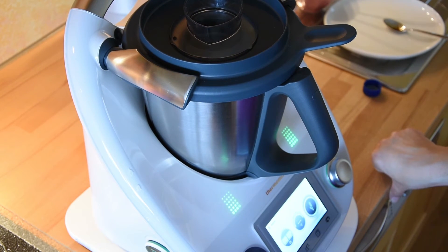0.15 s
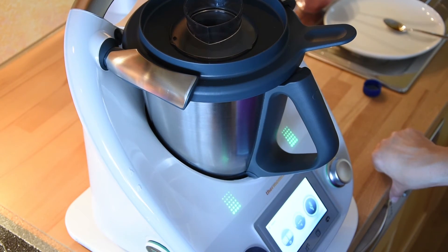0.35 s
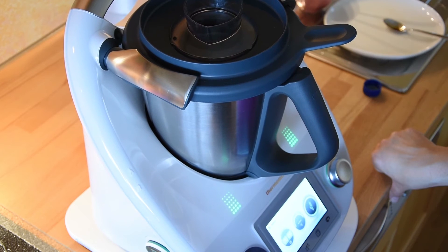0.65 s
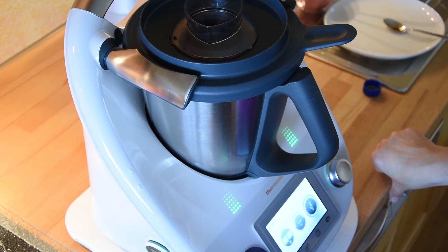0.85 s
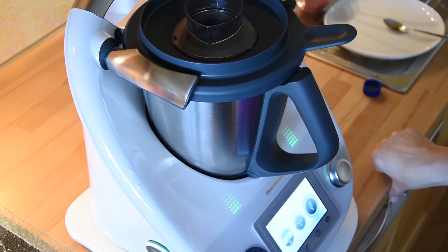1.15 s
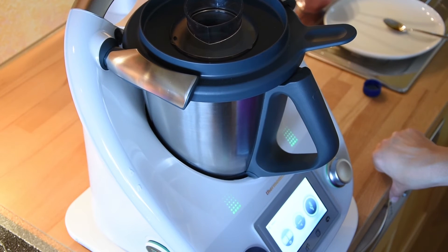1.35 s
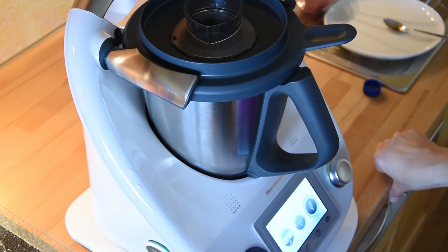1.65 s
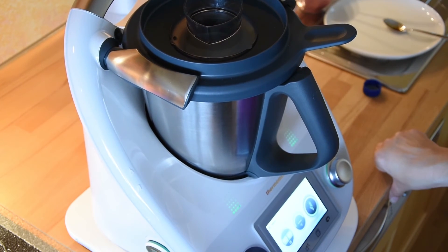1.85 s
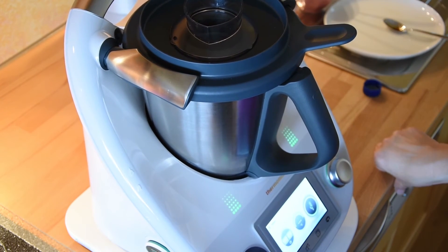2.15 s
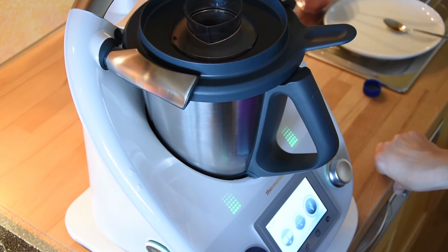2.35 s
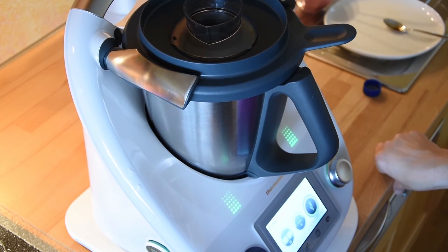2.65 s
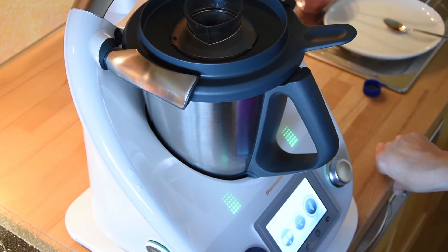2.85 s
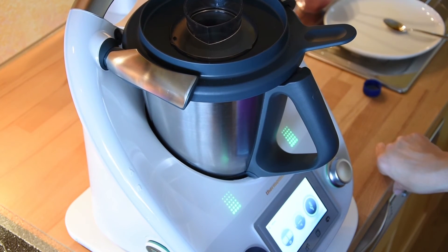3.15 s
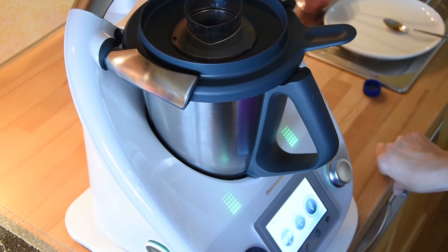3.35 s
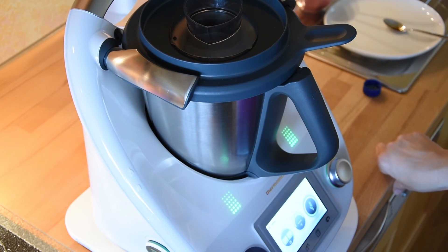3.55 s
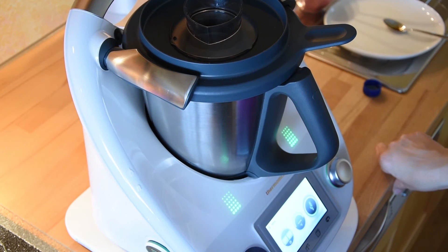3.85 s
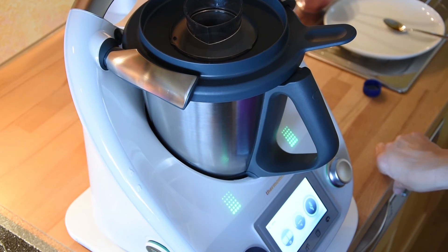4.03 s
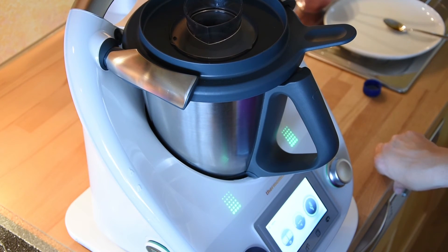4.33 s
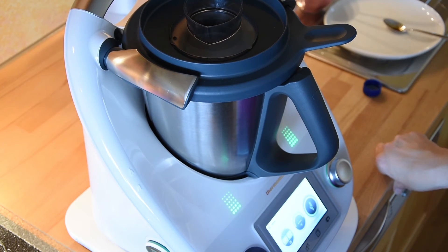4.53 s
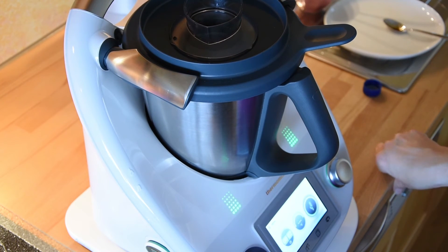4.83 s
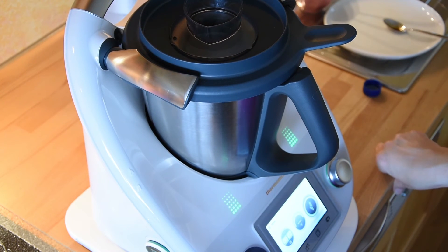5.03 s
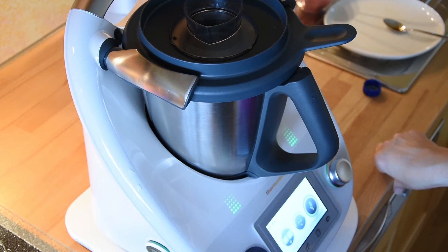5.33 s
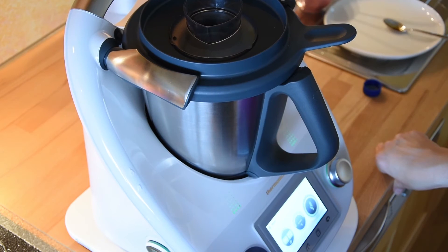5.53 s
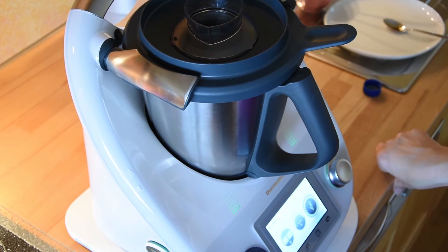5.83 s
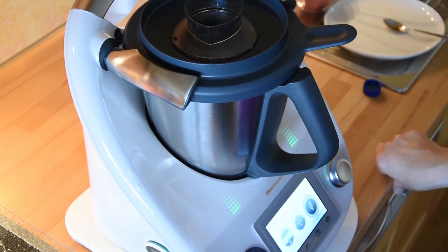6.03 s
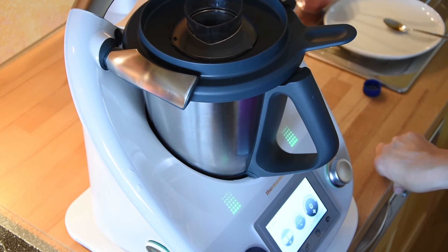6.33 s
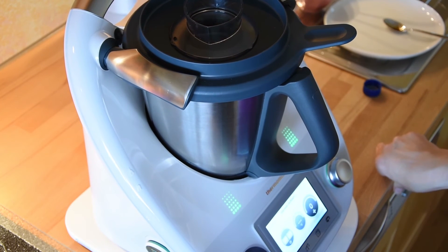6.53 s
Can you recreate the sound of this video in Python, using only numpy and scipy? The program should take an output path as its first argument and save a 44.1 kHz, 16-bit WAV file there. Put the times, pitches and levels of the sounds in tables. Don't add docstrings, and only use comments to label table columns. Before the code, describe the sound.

Quiet kitchen room tone with very faint hum and whine; a barely audible winding song from 0.2 s. At 0.3 s a food processor jerks on: a dense, rough, buzzing growl around 500 to 2000 Hz with an unsteady pole tone near 945 Hz, low counter rumble, wet lumps slapping the steel bowl and a bright electrical hiss. The rumble heaves irregularly; a loose cap rattles briefly, notably around 1.6 s, and tiny hard ticks scatter. At 2.64 s it brakes sharply, hiss lingering to about 2.85 s, with faint sagging tones and dull thumps until 3.1 s. Then quiet, one tiny tick at 4.6 s. At 5.33 s a second burst starts, with hard knocks near 5.47 s and heavy cap chatter from 5.7 s; it stops at 6.2 s, sagging briefly over low rocking. At 6.6 s crockery clangs hard, with quick small bounces.

```python
import sys
import numpy as np
from scipy import signal
from scipy.fft import rfft, irfft, next_fast_len
from scipy.io import wavfile
from scipy.ndimage import map_coordinates

SR = 44100
rng = np.random.default_rng(int(sys.argv[2]) if len(sys.argv) > 2 else 0)


def volts_from_decibels(level):
    exponent = np.asarray(level, float) / 20
    return 10 ** exponent


def waveform_to_disk(signal):
    frames = np.transpose(np.atleast_2d(signal))
    scaled = np.clip(frames, -1, 1) * 32767
    samples = np.round(scaled).astype(np.int16)
    wavfile.write(sys.argv[1], SR, samples)


N = 295019
TIME = np.arange(N) / SR

# [s, s, dB, s]
MOTOR_RUNS = [
    (0.313, 2.641, -22.5, 0.0059),
    (5.3312, 6.191, -22, 0.051),
]


def unit(x):
    return x / np.sqrt(np.mean(x ** 2) + 1e-20)


def along(points, hz):
    f, v = np.transpose(points)
    return np.interp(np.log(hz + 1), np.log(f + 1), v)


def over_time(points):
    return np.interp(TIME, *np.transpose(points))


def wobble(rate):
    knots = rng.standard_normal(int(N * rate / SR) + 4)
    return map_coordinates(knots, [TIME * rate])


def filtered(x, response):
    m = next_fast_len(N + SR // 2)
    spectrum = rfft(x, m) * response(np.fft.rfftfreq(m, 1 / SR))
    return irfft(spectrum, m)[..., :N]


def resonant(x, modes, skirt=1.24):
    def response(f):
        power = 0
        for centre, width, db in modes:
            flank = (1 + (2 * (f - centre) / width) ** 2) ** -np.clip(skirt, 1, 3)
            power = power + volts_from_decibels(2 * db) * flank
        return np.sqrt(power)
    return unit(filtered(x, response))


def coloured(x, spectrum):
    return unit(filtered(x, lambda hz: volts_from_decibels(along(spectrum, hz))))


def shaking(lumpy_db, rate):
    return unit(rng.standard_normal(N) * volts_from_decibels(lumpy_db * wobble(rate)))


def motor():
    housing, rumble, churn, hiss = run_gains()
    load = wobble(14)
    tone, pulls = rotor()
    out = housing * volts_from_decibels(0.41 * load) * (volts_from_decibels(-1) * housing_body() + tone) + pulls
    out += rumble * volts_from_decibels(1.1 * load + 0.8 * wobble(9)) * counter()
    out += churn * volts_from_decibels(0.9 * wobble(25)) * mixture()
    return out + hiss * volts_from_decibels(0.7 * wobble(17)) * switching()


def run_gains():
    # [s, dB]
    splash = [(.33, 6), (.6, 2.5), (.8, 1), (1.2, -1), (1.5, 1.5), (1.8, 0), (2.1, 1), (2.64, 1), (5.34, 6),
              (5.45, 3.5), (5.6, 3.5), (5.8, -1), (6.05, 7), (6.25, 0.5)]
    # [s, dB]
    heaves = [(.74, 9), (.94, 4.5), (1.2, 4.5), (1.6, 4), (1.87, 4), (2.21, 5.5), (2.63, 3.5), (5.44, 7),
              (5.665, 2), (5.8, 3.5), (6.06, 7)]
    engage_s, heave_s = 0.004, 0.037
    splash_db = over_time(splash)
    heave_db = sum(db * np.exp(-((TIME - s) / heave_s) ** 2) for s, db in heaves)
    gains = 0
    for start, cut, db, slump in MOTOR_RUNS:
        since, after = np.maximum(TIME - start, 0), np.maximum(TIME - cut, 0)
        settle = np.maximum(after - slump, 0)
        housing = volts_from_decibels(2 * np.exp(-since / 0.1) - 140 * after)
        housing = housing + (after > 0) * volts_from_decibels(-29.5 - 25 * after)
        lurch_db = 9.5 * np.exp(-since / 0.1)
        rumble = volts_from_decibels(-19.5 + lurch_db + heave_db - 135 * settle)
        churn = volts_from_decibels(-20 + splash_db - 93 * settle)
        braking_db = -5 * np.minimum(after / 0.045, 1) - 166 * np.maximum(after - 0.19, 0)
        hiss = volts_from_decibels(-31 + 0.91 * splash_db + braking_db)
        engaged = np.clip((TIME - start) / engage_s + 0.5, 0, 1) * volts_from_decibels(db)
        gains = gains + engaged * np.array([housing, rumble, churn, hiss])
    return gains


def housing_body():
    # [Hz, Hz, dB, dB]
    modes = [(538, 30, -10, -1), (572, 24, -9, -1), (816, 36, -14, 2), (885, 45, -11, -2),
             (943, 20, -4.5, -2), (1028, 20, -7, 2), (1085, 35, -9, 4), (1118, 22, -9, 2),
             (1190, 60, -12, 3), (1292, 45, -9, 1), (1383, 24, -13, 0), (1460, 45, -12, 0),
             (1540, 60, -13, 1), (1610, 55, -10, 1), (1692, 24, -7, 3), (1755, 40, -7, 1),
             (1805, 32, -2.5, -1), (1886, 26, -5, 0), (1935, 40, -11, 0), (2070, 90, -19, 0),
             (2186, 40, -17, 0), (2299, 30, -16, -1), (2420, 80, -18, 0), (2558, 32, -15, 0),
             (2680, 60, -23, 2)]
    # [Hz, dB per Hz]
    shell = [(250, -65), (400, -1.5), (480, 2), (640, -4), (720, -3.5), (800, -1.5), (1400, -6.5),
             (1950, -5), (2600, -7), (3000, -14.5), (3600, -62)]
    # [s, 0 soft, 1 stiff, above 1 stiffer still]
    stiffness = [(0, 0.27), (.45, 0.28), (.7, 0), (2.4, 0), (2.7, 0.74), (5.33, 0.42), (5.5, 1.6),
                 (5.7, 1.9), (5.9, 0.23), (6.3, 0.53)]
    torque = shaking(lumpy_db=-0.5, rate=160)
    soft = resonant(torque, [(hz, w, db) for hz, w, db, _ in modes])
    stiff = resonant(torque, [(hz, w, db + change) for hz, w, db, change in modes])
    ring = soft + (stiff - soft) * over_time(stiffness)
    return unit(ring + volts_from_decibels(-11) * coloured(shaking(lumpy_db=2, rate=150), shell))


def rotor():
    # [s, Hz, dB]
    pole_tone = [(.33, 945, -24), (.5, 945, -15), (.62, 942, -10), (.8, 939, -13), (1.05, 947, -9),
                 (1.3, 948, -11), (1.5, 941, -14), (1.75, 945, -10), (2.1, 948, -10), (2.35, 940, -12),
                 (2.64, 936, -14), (5.34, 950, -24), (5.55, 950, -18), (5.68, 946, -12), (5.82, 924, -10),
                 (5.95, 942, -11), (6.1, 940, -13), (6.25, 934, -13)]
    # [s, s, Hz, Hz, dB]
    drags = [(.32, 0.38, 850, 660, -32.5), (.315, .37, 283, 237, -38.5), (5.335, 5.43, 285, 273, -35.5),
             (.315, 0.35, 548, 560, -28), (.46, 0.53, 550, 575, -28), (1.662, 1.76, 560, 530, -30),
             (5.38, 5.47, 1800, 1600, -24.5), (2.1, 2.18, 560, 545, -31.5), (5.92, 5.97, 565, 576, -38),
             (5.63, 5.68, 660, 558, -32.5), (5.419, 5.623, 1095, 770, -33), (5.499, 5.585, 1770, 1730, -27),
             (5.601, 5.739, 1793, 1767, -29), (5.66, 5.76, 2000, 2700, -31), (5.596, 5.7, 970, 820, -29.5),
             (5.792, 5.878, 620, 490, -29), (6.05, 6.22, 1895, 1600, -29), (0.522, 0.9, 2100, 1600, -35),
             (2.48, 2.581, 1810, 1800, -35)]
    s, hz, db = np.transpose(pole_tone)
    speed = np.interp(TIME, s, hz)
    turn = 2 * np.pi * np.cumsum(speed) / SR + 0.95 * wobble(30)
    flutter_db = 3.5
    tone = volts_from_decibels(flutter_db * wobble(22)) * np.sin(turn)
    tone += volts_from_decibels(-5 + flutter_db * wobble(30)) * np.sin(2 * turn)
    pulls, rough, flutter = np.zeros(N), 0.7 * wobble(45), wobble(40)
    for start, end, from_hz, to_hz, level_db in drags:
        part = slice(round(start * SR), round(end * SR))
        glide = np.linspace(from_hz, to_hz, part.stop - part.start)
        swell = volts_from_decibels(level_db + 2 * flutter[part]) * np.hanning(len(glide)) ** 0.5
        pulls[part] += swell * np.sin(2 * np.pi * np.cumsum(glide) / SR + rough[part])
    first, second = MOTOR_RUNS
    unpowered = np.maximum(TIME - np.where(TIME < second[0], first[1], second[1]), 0)
    level = volts_from_decibels(np.interp(TIME, s, db + 0.5) - 150 * unpowered)
    return np.sqrt(2) * (level * tone), np.sqrt(2) * pulls


def counter():
    # [Hz, Hz, dB]
    modes = [(126.5, 34, -11.5), (190, 10.1, 1), (238.5, 48, -5.5), (283.5, 14, -3.5), (319, 64, -6)]
    return resonant(shaking(lumpy_db=1.5, rate=40), modes, skirt=1.5)


def mixture():
    # [Hz, dB per Hz]
    slap = [(1590, -24), (2700, 2), (3100, -2.5), (3290, 3), (3470, 3), (3880, 1), (4370, -2.5),
            (5330, -8.5), (6930, -14), (8390, -29), (10000, -21), (13000, -51.5), (22000, -120)]
    # [Hz, Hz, dB]
    bowl = [(3350, 190, 0.5), (4990, 130, -7), (7420, 69, -18), (7800, 58, -15), (7900, 60, -10),
            (8500, 240, -15), (9700, 63, -13), (11070, 96, -24), (13000, 85, -20)]
    wet = coloured(shaking(lumpy_db=2, rate=300), slap)
    return unit(wet + 0.45 * resonant(shaking(lumpy_db=2, rate=300), bowl))


def switching():
    # [Hz, dB per Hz]
    sizzle = [(5290, -12), (9000, 3), (9750, 0), (11100, 4), (11500, -5), (12100, -6), (13700, -13),
              (15600, -25)]
    # [Hz, Hz, dB]
    whine = [(11160, 200, -1), (11560, 160, -3)]
    chopped = shaking(lumpy_db=1.5, rate=400)
    return unit(coloured(chopped, sizzle) + volts_from_decibels(-12) * resonant(chopped, whine))


def waking():
    # [s, s, s, dB]
    wake = [
        (.2, .25, .315, -60),
        (5.17, 5.268, 5.333, -60),
    ]
    # [Hz, Hz, dB]
    windings = [(1830, 170, 0), (1800, 40, 6), (1870, 40, 3)]
    gain = 0
    for creep, on, end, db in wake:
        times = [creep, on - 0.01, on, end, end + 0.01]
        levels = [db - 18, db - 3, db, db + 5, -90]
        gain = gain + volts_from_decibels(np.interp(TIME, times, levels, -120, -120))
    return gain * resonant(rng.standard_normal(N), windings)


def cap():
    # [s, dB, dB, s]
    knocks = [(0.309, -43.5, -7, 0.03), (0.358, -38.5, 3.5, 0.046), (0.513, -48.5, 0, .04),
              (1.582, -41, 0, 0.03), (1.635, -39.5, 0.5, 0.037), (1.682, -41, 3.5, 0.031),
              (1.721, -41, -3, .015), (1.86, -49, -2, 0.018), (2.6, -43, 3, 0.049),
              (5.327, -44.5, -8, 0.045), (5.57, -43, 2, 0.14), (5.691, -41, -2, 0.022),
              (5.728, -40, 4.5, 0.019), (5.764, -40.5, 1, 0.067), (5.834, -44, 4, 0.029),
              (5.865, -37, 0, 0.046), (5.924, -37, -1, 0.057), (5.978, -35, -7, 0.018),
              (6.03, -34.5, -2.5, 0.073), (6.069, -38, -4, 0.053), (6.133, -36, -4, 0.024),
              (6.174, -38.5, 0, 0.04), (6.235, -36, 0.5, 0.06)]
    # [Hz, Hz, dB]
    high_modes = [(5200, 84, -3), (5600, 25, -3), (6350, 190, 3), (7000, 42, -18), (7250, 110, 7.5),
                  (7660, 52, 11), (8450, 210, 7.5), (8920, 57, -15), (9110, 44, 4), (10200, 33, 1),
                  (11200, 280, -9), (12100, 55, -13)]
    low_modes = [(3170, 120, 5.5), (3670, 130, 7), (4125, 49, 8)]
    # [Hz, dB per Hz]
    broad = [(2650, 1), (4500, -17), (6180, 2), (6750, -16.5), (8620, -1), (9370, -6.5), (11700, -10),
             (15600, -53)]
    high, low = np.zeros((2, N))
    t = TIME[:SR // 4]
    for s, db, low_db, length in knocks:
        fall_db = 60 * t / 0.8 + 60 * np.maximum(t - length, 0) / 0.1
        buzz = volts_from_decibels(db - fall_db) * (1 - np.exp(-t / 0.001))
        high[round(s * SR):][:len(t)] += buzz
        low[round(s * SR):][:len(t)] += buzz * volts_from_decibels(low_db)
    chatter = shaking(lumpy_db=2, rate=500)
    bright = resonant(chatter, high_modes, skirt=1.1)
    bright = bright + 1.1 * coloured(shaking(lumpy_db=2, rate=450), broad)
    clack = resonant(chatter, [(hz, 3 * w, db) for hz, w, db in low_modes], skirt=0.8)
    return high * unit(bright) + low * clack


def ticks():
    # [s, dB, Hz]
    hits = [(.679, -46, 5200), (.718, -50, 6000), (.855, -46, 5900), (1.13, -49, 5700), (1.245, -44, 11000),
            (1.361, -49, 10000), (1.445, -43, 8000), (1.522, -41, 5430), (1.9, -47, 8000),
            (1.966, -48, 6100), (2.079, -49, 5200), (2.137, -41, 7950), (2.26, -43, 7000),
            (2.305, -46, 6000), (2.385, -44, 5000), (2.448, -55, 8000), (2.467, -38.5, 10100),
            (2.484, -39, 9000), (4.636, -60, 2600), (5.468, -27, 3600), (5.475, -28, 3600),
            (.316, -44, 10000), (5.334, -42, 10000), (.882, -48, 8000), (1.643, -42, 8000),
            (1.692, -40, 8200), (5.736, -40, 8500), (6.6045, -30, 2900), (6.605, -46, 10500)]
    out, t = np.zeros(N), TIME[:1024]
    f = np.fft.rfftfreq(len(t), 1 / SR)
    for s, db, hz in hits:
        distance = np.log((f + 1) / hz) / (hz / 30000)
        band = 1 / (1 + distance ** 4) / (1 + (f / 12000) ** 8)
        puff = unit(irfft(rfft(rng.standard_normal(len(t))) * band))
        out[round(s * SR):][:len(t)] += volts_from_decibels(db - 60 * t / 0.063) * puff
    return out


def cogging():
    # [s, s, Hz, dB, dB]
    cogs = [(2.735, 2.87, 1097, -43, -11), (2.72, 2.85, 1645, -43, -18), (2.76, 2.84, 548, -57, -30),
            (2.75, 2.89, 2735, -58, -30), (2.81, 2.915, 942, -47, -6), (2.85, 2.93, 1700, -55, -30),
            (2.78, 2.88, 3400, -66, -30), (3.01, 3.07, 2550, -65, -30), (3.035, 3.13, 946, -57, -1),
            (6.3, 6.41, 1010, -46, -14), (6.43, 6.51, 1010, -59, -30), (6.4, 6.46, 1775, -56, -30),
            (6.55, 6.6, 1009, -57, -30), (6.575, 6.61, 1850, -61, -30)]
    # [s, dB, Hz]
    thumps = [(2.873, -56, 290), (2.872, -58, 140), (2.89, -61, 185), (2.8, -60, 205), (2.955, -59, 190),
              (2.947, -57, 125), (2.965, -55, 110)]
    out = np.zeros(N)
    phase, flutter = 0.85 * wobble(50), wobble(70)
    rise, fade_db, sag = 0.4, 15, 0.06
    for start, end, hz, db, second_db in cogs:
        part = slice(round(start * SR), round(end * SR))
        since = TIME[part] - start
        turn = 2 * np.pi * hz * (TIME[part] - sag * since ** 2 / 2) + phase[part]
        u = np.linspace(0, 1, len(turn))
        swell = np.minimum(u / rise, 1) * volts_from_decibels(-fade_db * np.maximum(u - rise, 0))
        swell = swell * np.minimum(5 - 5 * u, 1)
        tone = np.sin(turn) + volts_from_decibels(second_db) * np.sin(2 * turn)
        out[part] += volts_from_decibels(db + 5 + 2 * flutter[part]) * swell * tone
    t = TIME[:SR // 10]
    for s, db, hz in thumps:
        push = volts_from_decibels(db + 15.5 - 60 * t / 0.058) * (1 - np.exp(-t / 0.0017))
        out[round(s * SR):][:len(t)] += push * np.sin(2 * np.pi * hz * t)
    return out


def dish():
    # [Hz, dB, s]
    modes = [(530, -37, .3), (541, -22, .13), (987, -39, 1), (1110, -41, 1), (1716, -41, 3),
             (2370, -41, .12), (2600, -35, .07), (2877, -34, .08), (3085, -33, .07), (3267, -35, .07),
             (3741, -39, .4), (3880, -35, .1), (4005, -34, .15), (4250, -45, .1), (4829, -60, .2)]
    # [s, dB, dB]
    blows = [
        (6.6043, 1, -1),
        (6.6085, -4, -20),
        (6.614, -15, -20),
        (6.633, -13, -20),
        (6.641, -13, -20),
        (6.669, -16, 9),
    ]
    # [Hz, dB, s]
    strike = [(8290, -48, .08), (10520, -40.5, .04), (11100, -45, .05), (11500, -54, .03),
              (288, -53.5, 0.56)]
    # [Hz, dB per Hz]
    clatter = [(250, -40), (400, -16), (550, -9), (800, -9), (1100, -6), (1400, -16.5), (2200, -15),
               (3000, -9), (4100, -6.5), (4700, -27), (6500, -32), (8200, -25), (9500, -31), (11000, -30),
               (15000, -46)]
    out, fade, t = np.zeros(N + SR), np.zeros(N + SR), TIME[:SR // 4]
    for s, blow_db, low_db in blows:
        ring = 0
        for hz, db, t60 in modes:
            decay = volts_from_decibels(db + low_db * (hz < 2000) - 60 * t / t60)
            attack = 1 - np.exp(-t * hz ** 2 / 2500)
            ring = ring + decay * attack * np.sin(2 * np.pi * hz * t)
        out[round(s * SR):][:len(t)] += volts_from_decibels(blow_db + 2.5) * ring
        fade[round(s * SR):][:len(t)] += volts_from_decibels(blow_db - 35 - 60 * t / 0.22)
    first = round(blows[0][0] * SR)
    for hz, db, t60 in strike:
        out[first:][:len(t)] += volts_from_decibels(db - 60 * t / t60) * np.sin(2 * np.pi * hz * t)
    return out[:N] + fade[:N] * coloured(rng.standard_normal(N), clatter)


def swaying():
    # [s, dB]
    sway = [(5.6, -90), (5.8, -60), (6, -62), (6.15, -70), (6.3, -57), (6.45, -68), (6.55, -89)]
    # [Hz, Hz, dB]
    band = [(85, 40, 0)]
    gain = volts_from_decibels(np.interp(TIME, *np.transpose(sway), -120, -120))
    return gain * resonant(rng.standard_normal(N), band)


def kitchen(x):
    # [Hz, s]
    reverb = [(200, 0.67), (2000, 0.13), (10000, 0.34)]
    hz, t, z = signal.stft(rng.standard_normal((2, SR // 2)), SR, nperseg=256)
    decay = volts_from_decibels(-60 * t / along(reverb, hz)[:, None])
    tail = signal.istft(z * decay, SR, nperseg=256)[1]
    return signal.fftconvolve(x[None], tail / np.linalg.norm(tail[0]), axes=1)[:, :N]


def air():
    # [Hz, dB per Hz]
    tone = [(20, -12), (35, -6), (60, -7.5), (100, -3.5), (160, -5.5), (250, -1), (650, 0), (900, -2.5),
            (1450, -5.5), (2100, -9.5), (4000, -12.5), (10000, -16.5), (12500, -21), (15800, -19)]
    # [Hz, dB]
    width = [(60, -11), (110, -8), (200, -7), (380, -8), (700, -8), (1290, -5), (2380, -2), (4400, -0.5),
             (8120, -1), (15000, 2)]
    # [Hz, dB]
    lines = [
        (99, -83),
        (1171, -75),
        (1465, -75),
        (1997, -79),
    ]
    air_db = -58.5
    mid = coloured(rng.standard_normal(N), tone) * volts_from_decibels(air_db + 0.18 * wobble(3.4))
    side = coloured(rng.standard_normal(N), tone)
    side = filtered(side, lambda hz: volts_from_decibels(air_db + along(width, hz)))
    for hz, db in lines:
        mid = mid + volts_from_decibels(db) * np.sin(2 * np.pi * hz * TIME + 0.3 * wobble(4))
    return np.array([mid + side, mid - side])


def scene():
    # [Hz, dB]
    machine_side = [(60, -32), (110, -51), (200, -53), (380, -87), (700, -26.5), (1290, -22), (2380, -14),
                    (4400, -13.5), (8120, -17.5), (12000, -7), (15000, -15)]
    near = motor() + cap() + ticks() + waking() + cogging() + dish()
    near = filtered(near, lambda hz: 1 / (1 + (105 / (hz + 1)) ** 5))
    echo, scatter = kitchen(near)
    mid = near + volts_from_decibels(-15) * echo + swaying()
    side = filtered(scatter, lambda hz: volts_from_decibels(along(machine_side, hz)))
    return np.array([mid + side, mid - side]) + air()


def top_cut(x):
    return signal.sosfilt(signal.butter(12, 16260, fs=SR, output="sos"), x)


def record(dry):
    mix = filtered(dry, lambda hz: hz < 15760)
    return top_cut(mix)


dry = scene()
out = record(dry)
waveform_to_disk(out)
```